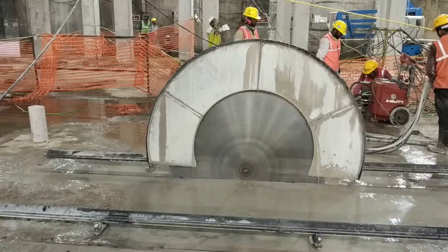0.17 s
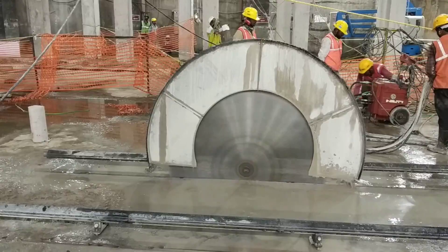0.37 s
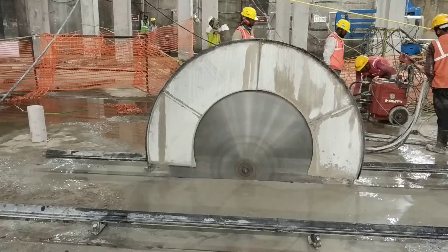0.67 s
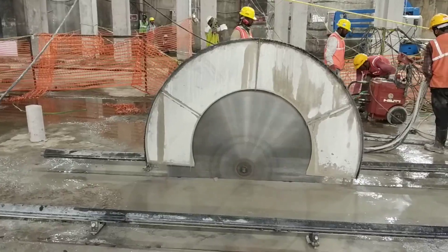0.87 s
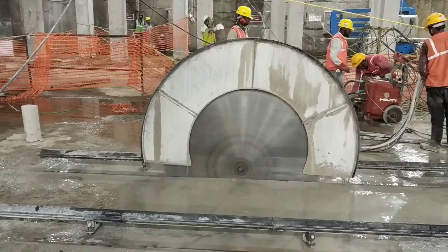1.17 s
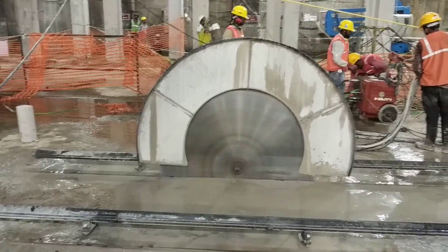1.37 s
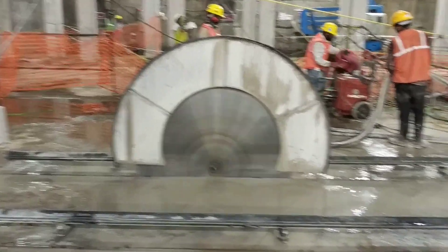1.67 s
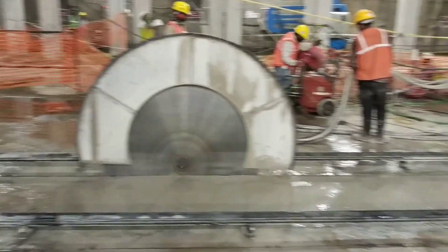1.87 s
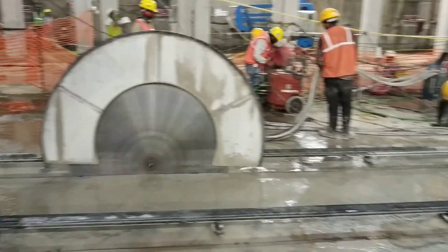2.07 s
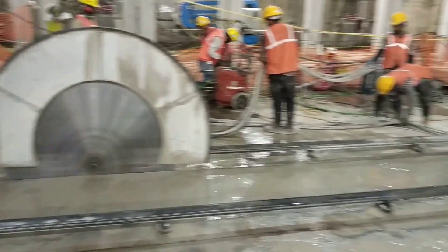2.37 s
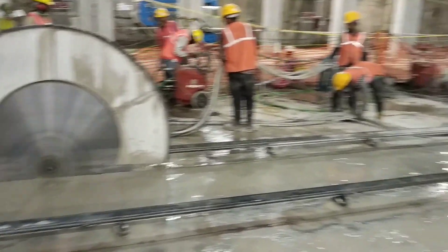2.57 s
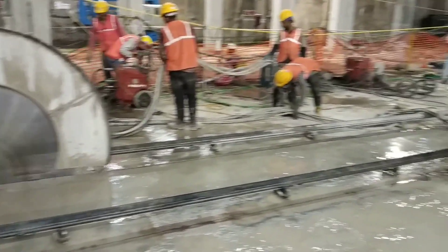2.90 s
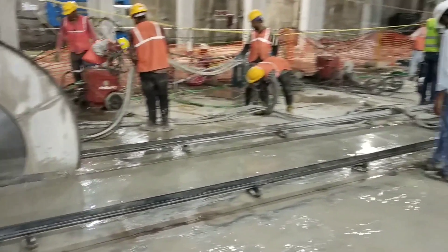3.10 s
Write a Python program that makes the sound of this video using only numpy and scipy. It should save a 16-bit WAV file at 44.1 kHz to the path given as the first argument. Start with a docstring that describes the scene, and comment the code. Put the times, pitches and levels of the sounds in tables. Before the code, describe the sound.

Fading in quickly, a huge concrete saw roars steadily on a building site, with spray hiss, ringing blade, low throb and power unit hum; soft air puffs touch the left microphone before it swings right.

```python
"""A big track saw cuts a wet concrete floor on a building site, a few metres away.
The blade throbs in low swells once a turn and drums as rough noise, part of which comes back every turn.
Grit and water hiss: dense tiny impacts, coloured by filters. Blade and guard ring; the drive and power unit hum.
The sound fades in, puffs of air touch the left microphone port, and late on the microphone turns away to the right."""
import sys
import numpy as np
from scipy import signal
from scipy.fft import rfft, irfft, next_fast_len
from scipy.io import wavfile
from scipy.ndimage import map_coordinates

SR = 44100
rng = np.random.default_rng(int(sys.argv[2]) if len(sys.argv) > 2 else 0)


def wav_out(sig):
    """Save sig, one row per channel (or a flat mono array), as 16-bit PCM at SR to the path in sys.argv[1]."""
    wavfile.write(sys.argv[1], SR, np.round(np.clip(np.atleast_2d(sig).T, -1, 1) * 32767).astype(np.int16))


N = 142884  # length in samples, 3.24 s
TURN_HZ = 9.48  # blade turns a second


def amp(db):
    """Turn decibels into a gain."""
    return 10 ** (np.asarray(db) / 20)


def unit(x):
    """Scale a sound to an rms of 1."""
    return x / np.sqrt(np.mean(x ** 2) + 1e-20)


def along(points, hz):
    """Read a (frequency, value) table on a log frequency axis."""
    f, v = np.transpose(points)
    return np.interp(np.log(hz + 1), np.log(f + 1), v)


def curve(points):
    """Read a (time, value) table at every sample."""
    return np.interp(np.arange(N) / SR, *np.transpose(points))


def wobble(rate):
    """A smooth random curve with `rate` random points a second."""
    points = rng.standard_normal(int(N * rate / SR) + 4)
    return map_coordinates(points, [np.arange(N) * rate / SR])


def filtered(x, response):
    """Filter x with a response given as a function of frequency."""
    m = next_fast_len(N + SR // 2)  # spare room for the tail
    hz = np.fft.rfftfreq(m, 1 / SR)
    return irfft(rfft(x, m) * response(hz), m)[..., :N]


def pan(db):
    """Left and right gains; a positive level difference makes the left louder."""
    return amp(np.array([[.5], [-.5]]) * db)


# How alike left and right are: (frequency [Hz], coherence [0-1])
LIKENESS = [(60, 0.6), (200, 0.99), (380, 0.82), (700, 0.81), (1290, 0.09), (2400, 0.033), (8000, 0.13)]


def voiced(pair, spectrum, balance):
    """Two unrelated noises become a coloured stereo sound whose middle has rms 1."""
    def colour_and_width(hz):
        angle = np.arccos(np.clip(along(LIKENESS, hz), -1, 1)) / 2
        return amp(along(spectrum, hz)) * [np.cos(angle), np.sin(angle)]

    mid, side = filtered(pair, colour_and_width)
    stereo = np.array([mid + side, mid - side])
    both = filtered(stereo, lambda hz: pan(along(balance, hz)))
    return both / np.std(both.mean(axis=0))


def since(first_s):
    """Time [s] from the nearest of the moments that come once a turn."""
    turns = (np.arange(N) / SR - first_s) * TURN_HZ
    return ((turns + .5) % 1 - .5) / TURN_HZ


# How far the microphone has turned away: (time [s], share [0-1])
TURNED = [(.4, 0.22), (1.55, 0.15), (2, 0.15), (2.4, 0.44), (3.2, 0.91)]


def turned_away():
    """The turn of the microphone: 0 faces the blade, 1 is fully turned away."""
    return np.clip(curve(TURNED), 0, 1)


# Colour of the blade and guard drumming: (frequency [Hz], relative level per Hz [dB])
DRUM_COLOUR = [(15, -26), (30, -2), (90, -10.5), (115, -2), (160, -7), (205, -1), (250, 1), (300, -1),
               (360, -3), (470, -5.5), (580, -4), (720, -8.5), (920, -2.5), (1100, -9.5), (1350, -2),
               (1650, -4.5), (1950, -10), (2400, -5.5), (3100, -52), (5000, -100)]
# How much of the drumming repeats every turn: (frequency [Hz], share of power [0-1])
REPEATS = [(30, 0.13), (180, 0.2), (260, 0.55), (600, 0.43), (1000, 0.08), (2000, 0.1)]
# Change of colour once the microphone has turned away: (frequency [Hz], gain [dB])
DRUM_ASIDE = [(100, 4), (220, 0.5), (420, -1.5), (870, 3.5), (1450, -3.5), (2200, 3)]
# Drumming as the load on the saw changes: (time [s], level [dB])
LOAD = [(.15, 0.5), (.5, -0.5), (1, -0.6), (1.6, 0.06), (2.1, -1.1), (2.6, -0.5), (3.2, -1.9)]
DRUM_DB = -31  # rms facing the blade, before the load
DRUM_PAN_DB = -1.5  # left over right


def drumming():
    """The blade drums on guard and slab: rough noise, part of which comes back every turn."""
    samples_per_turn = int(SR / TURN_HZ)
    pattern = rng.standard_normal((2, SR // 2))[:, np.arange(N) % samples_per_turn]
    fresh = rng.standard_normal((2, N))
    share = lambda hz: np.clip(along(REPEATS, hz), 0, 1)
    repeating = filtered(pattern, lambda hz: np.sqrt(share(hz)))
    changing = filtered(fresh, lambda hz: np.sqrt(1 - share(hz)))
    facing = amp(DRUM_DB) * voiced(repeating + changing, DRUM_COLOUR, [(100, DRUM_PAN_DB)])
    aside = filtered(facing, lambda hz: amp(along(DRUM_ASIDE, hz)))
    return amp(curve(LOAD)) * (facing + turned_away() * (aside - facing))


# High spots of the blade that bite once a turn: (first bite [s], pitch [Hz], half length [s],
# glide [Hz per s], peak before strength and wobble [dB], share of THROB_STRENGTH followed [0-1])
THROBS = [(.054, 185, .018, 600, -30, 1), (.015, 270, .012, 0, -37, 0), (.084, 268, .014, -2500, -36.5, 0)]
# Strength of the low throb: (time [s], level [dB])
THROB_STRENGTH = [(.3, -2.5), (.75, 2.5), (1.3, 0), (2.2, -2.5), (2.55, -7), (3, 0.5)]


def throb():
    """High spots load the slab once a turn: one strong low swell and two lighter ones, two gliding in pitch."""
    out, strength_db = np.zeros(N), curve(THROB_STRENGTH)
    for first_s, hz, half_s, glide, db, follows in THROBS:
        u = since(first_s)
        envelope = np.exp(-(u / half_s) ** 2)
        swell = envelope * np.sin(2 * np.pi * (hz * u + glide * u ** 2 / 2))
        out = out + amp(db + follows * strength_db + wobble(TURN_HZ)) * swell
    return pan(DRUM_PAN_DB) * out


# Resonance of the guard: (frequency [Hz], relative level per Hz [dB])
GUARD_COLOUR = [(400, -45), (600, -7), (700, -0.5), (790, 0.5), (900, -12), (1200, -45)]
# Ringing of the guard, before the scrape shapes it: (time [s], level [dB])
GUARD_LEVEL = [(.3, -39.5), (.7, -38.5), (1.05, -43.5), (1.45, -43), (1.65, -29.5), (1.85, -41.5),
               (2.1, -50), (2.3, -40), (2.55, -44.5), (3.2, -42)]
SCRAPE_AT_S, SCRAPE_S, SCRAPE_REST_DB = 0.085, 0.0079, -6  # first scrape, half length, level between


def guard():
    """The guard rings with a hollow note, strongest as the blade scrapes past on each turn."""
    scrape = amp(SCRAPE_REST_DB) + np.exp(-(since(SCRAPE_AT_S) / SCRAPE_S) ** 2)
    ring = voiced(rng.standard_normal((2, N)), GUARD_COLOUR, [(100, DRUM_PAN_DB)])
    return amp(curve(GUARD_LEVEL)) * scrape * ring


def impacts(per_s, spread_db):
    """Two unrelated streams of dense tiny impacts of scattered size."""
    hit = rng.random((2, N)) < per_s / SR
    extra_db = spread_db * rng.exponential(size=(2, N)).clip(0, 6)
    return unit(hit * rng.standard_normal((2, N)) * amp(extra_db))


def scattered(x, smear_s=0.00204):
    """Bounces inside the guard smear each impact in time and leave its colour alone."""
    knots = rng.standard_normal((2, 80))

    def delays(hz):
        return smear_s * np.array([np.interp(hz, np.linspace(0, SR / 2, len(k)), k) for k in knots])

    # adding up the delays over frequency gives the phase
    return filtered(x, lambda hz: np.exp(-2j * np.pi * np.cumsum(delays(hz), axis=1) * hz[1]))


PATCH_HZ, PATCH_S = 75, .06  # width and length of a patch in the hiss


def shifting(x, depth_db):
    """The colour of the hiss shifts in patches while its overall level holds."""
    hz, t, z = signal.stft(x, SR, nperseg=1024)
    places = np.meshgrid(hz / PATCH_HZ, t / PATCH_S, indexing="ij")
    field = map_coordinates(rng.standard_normal((400, 200)), places, mode="mirror")
    patched = signal.istft(z * amp(depth_db * field), SR, nperseg=1024)[1][:, :N]
    return np.std(x) * unit(patched)


def swelling(swing_db):
    """A gain that rises and falls by swing_db once a turn."""
    return amp(swing_db * np.cos(2 * np.pi * TURN_HZ * np.arange(N) / SR))


# Treble balance, facing the blade and turned away: (frequency [Hz], left over right [dB])
TREBLE_FACING = [(2000, 4), (2400, 1), (2700, -4), (3200, -2), (4000, -2), (4700, -4), (5600, 1.5),
                 (7700, -1), (8800, 5.5), (11500, 5), (14000, -1.5)]
TREBLE_ASIDE = [(2000, 6), (2400, 6), (2700, -4), (3200, 1.5), (4000, 0), (4700, -1), (5600, 1.5),
                (7700, -1.5), (8800, 4), (11500, 3), (14000, 5)]


def facing_and_aside(streams, colours, levels_db):
    """Blend the sound facing the blade into the sound turned away, by power."""
    turned = turned_away()
    facing = amp(levels_db[0]) * voiced(streams(), colours[0], TREBLE_FACING)
    aside = amp(levels_db[1]) * voiced(streams(), colours[1], TREBLE_ASIDE)
    return np.sqrt(1 - turned) * facing + np.sqrt(turned) * aside


# Colour of the grinding, facing and turned away: (frequency [Hz], relative level per Hz [dB])
GRIND_FACING = [(1200, -14), (1950, -13), (2350, -2.5), (2480, -26), (2600, -5), (2950, 1.5), (3300, 4.5),
                (3700, 3.5), (4200, 3), (4850, 3.5), (5600, -14), (6600, -0.5), (7600, -1), (10000, -53)]
GRIND_ASIDE = [(1200, -39), (1950, -12), (2350, -1.5), (2480, 1.5), (2600, -2), (2950, 1.5), (3300, 1),
               (3700, 3), (4200, -8), (4850, 3), (5600, 2.5), (6600, 1.5), (7600, 4), (10000, -21)]
GRIND_LEVELS_DB = -22.5, -18.5  # facing, turned away
GRIT_PER_S, GRIT_SPREAD_DB = 9000, 2.5
GRIND_PATCH_DB, GRIND_SWING_DB = 3.3, .35  # depth of the patches, swell with each turn


def grinding():
    """The blade segments grind in the slot: many tiny grit impacts, swelling slightly once a turn."""
    grit = lambda: impacts(GRIT_PER_S, GRIT_SPREAD_DB)
    grind = facing_and_aside(grit, (GRIND_FACING, GRIND_ASIDE), GRIND_LEVELS_DB)
    return shifting(scattered(grind), GRIND_PATCH_DB) * swelling(GRIND_SWING_DB)


# Colour of the water spray, facing and turned away: (frequency [Hz], relative level per Hz [dB])
SPRAY_FACING = [(4500, -23.5), (6800, -30), (7700, 4.5), (8500, 4.5), (9400, 0.5), (10700, -1.5),
                (11400, -11.5), (12700, -2.5), (14200, -19), (15000, -30), (15700, -4)]
SPRAY_ASIDE = [(4500, -56), (6800, -32), (7800, -12), (8500, 5.5), (9400, 3.5), (10700, 5), (11800, 1.5),
               (12700, 5.5), (14200, 4), (15000, 1), (15700, -1)]
# Gain of the top treble of the spray: (time [s], level [dB])
FIZZ = [(.4, -2), (.8, -0.7), (1.6, 1.5), (1.9, 3.5), (2.6, 0.8), (3.1, -3)]
FIZZ_ABOVE_HZ = 10900
SPRAY_LEVELS_DB = -17, -13.5  # facing, turned away, before the fizz
DROPS_PER_S, DROP_SPREAD_DB = 14000, 0
SPRAY_PATCH_DB, SPRAY_SWING_DB = 2.7, .25  # depth of the patches, swell with each turn


def spraying():
    """Water flung off the rim hisses: many tiny drop impacts, swelling slightly once a turn."""
    drops = lambda: impacts(DROPS_PER_S, DROP_SPREAD_DB)
    spray = facing_and_aside(drops, (SPRAY_FACING, SPRAY_ASIDE), SPRAY_LEVELS_DB)
    top = filtered(spray, lambda hz: hz > FIZZ_ABOVE_HZ)
    spray = spray + (amp(curve(FIZZ)) - 1) * top
    return shifting(scattered(spray), SPRAY_PATCH_DB) * swelling(SPRAY_SWING_DB)


def cutting(surge_db=0.5, ripple_db=-0.03):
    """Grit and water leave the rim and surge slightly together."""
    surge = amp(surge_db * wobble(21.09) + ripple_db * wobble(450))
    return surge * (grinding() + spraying())


# Ringing modes of the steel blade: (frequency [Hz], rms level [dB])
BLADE_MODES = [(7634, -38), (7908, -35.5), (8100, -40), (8290, -41), (8400, -39), (8630, -39),
               (8781, -36.5), (10037, -41), (10419, -39.5), (10703, -39.5), (12720, -42), (14347, -40.5)]
BLADE_WIDTH_HZ = 20  # sets how fast each mode varies


def ringing():
    """Grit keeps the high modes of the blade ringing at random strength."""
    t = np.arange(N) / SR

    def mode(hz):
        """One mode: a cosine and a sine, each with its own random strength."""
        knots = rng.standard_normal((2, 800))
        a, b = (np.interp(t * 2 * BLADE_WIDTH_HZ, np.arange(len(k)), k) for k in knots)
        return unit(a * np.cos(2 * np.pi * hz * t) + b * np.sin(2 * np.pi * hz * t))

    return np.array([sum(amp(db) * mode(hz) for hz, db in BLADE_MODES) for port in range(2)])


TONE_FLUTTER_DB = 0.4


def tone(hz, drift_hz):
    """A slightly unsteady tone of rms 1."""
    phase = 2 * np.pi * np.cumsum(hz + drift_hz * wobble(14)) / SR
    wave = np.sin(phase + 2 * np.pi * rng.random())
    return unit(wave * amp(TONE_FLUTTER_DB * wobble(5.85)))


# Tones of the drive and power unit: (frequency [Hz], rms level [dB], unsteadiness [Hz])
HUM_TONES = [(37.7, -45.3, .1), (56, -51, .1), (75.4, -46.5, .1), (97, -52, .1), (104, -52.5, .1),
             (120, -47.5, .1), (126.7, -52, .1), (151, -53, .1), (264.1, -46.5, .1), (336.4, -42.2, .1),
             (672.8, -53, .5), (969, -47.5, .4), (1631, -53, 2), (2450, -52, 3)]
# A gear of the drive whines: (time [s], level [dB])
WHINE = [(.2, -43), (.75, -53), (1.1, -39), (1.5, -48), (2.7, -51), (3.05, -39.5), (3.2, -42.5)]
# The blade sings on one note: (time [s], level [dB])
SING = [(.1, -41), (.42, -38.5), (.75, -40), (1.05, -45), (1.3, -55), (2, -54), (2.3, -53), (3.2, -54)]
WHINE_HZ, SING_HZ = 1367, 818.2
TONE_PAN_DB = -1  # left over right


def machines():
    """Hum and gear whine of the drive and power unit, and the singing of the blade, all as tones."""
    hum = sum(amp(db) * tone(hz, drift) for hz, db, drift in HUM_TONES)
    whine = amp(curve(WHINE)) * tone(WHINE_HZ, drift_hz=1.53)
    singing = amp(curve(SING)) * tone(SING_HZ, drift_hz=0.4)
    return pan(TONE_PAN_DB) * (hum + whine + singing)


# Puffs of air on the left port: (start time [s], peak level [dB])
PUFFS = [(.755, -24), (1.045, -25), (1.155, -29), (1.49, -26), (1.79, -26), (1.85, -26), (2.115, -23),
         (2.425, -29)]
PUFF_RISE_S, DRAUGHT_DB = 0.023, -42  # time to the peak of a puff, rms of the steady air


def draught():
    """Moving air presses on the left port: a low rumble of noise and soft puffs."""
    t = np.arange(N) / SR
    air_colour = [(6, 13), (25, -22), (100, -45), (1000, -100)]  # (frequency [Hz], level [dB])
    rumble = filtered(rng.standard_normal(N), lambda hz: amp(along(air_colour, hz)))
    air = amp(DRAUGHT_DB) * unit(rumble)
    for start_s, db in PUFFS:
        u = np.maximum(t - start_s, 0) / PUFF_RISE_S
        air = air - amp(db) * u * np.exp(1 - u)  # quick push, slow release
    return np.array([air, np.zeros(N)])


def scene():
    """The saw, its machines and the air at the microphone."""
    saw = drumming() + throb() + guard() + cutting() + ringing()
    return saw + machines() + draught()


# Fade-in: (time [s], level [dB])
FADE = [(0, -77), (.102, -75), (.108, -21.5), (.14, -10), (.19, -8.5), (.23, -4.5), (.28, -3), (.36, -0.1),
        (.6, 0)]
KNEE, TOP_HZ = 4.9, 15830  # hardness of the overload, band limit


def record(dry):
    """The recorder fades in, rounds off the highest peaks and keeps nothing above its band limit."""
    x = dry * amp(curve(FADE))
    x = x / (1 + np.abs(x) ** KNEE) ** (1 / KNEE)
    low_pass = lambda hz: np.clip((TOP_HZ - hz) / 60 + .5, 0, 1)  # 60 Hz wide slope
    return filtered(x, low_pass)


dry = scene()
out = record(dry)
wav_out(out)
```